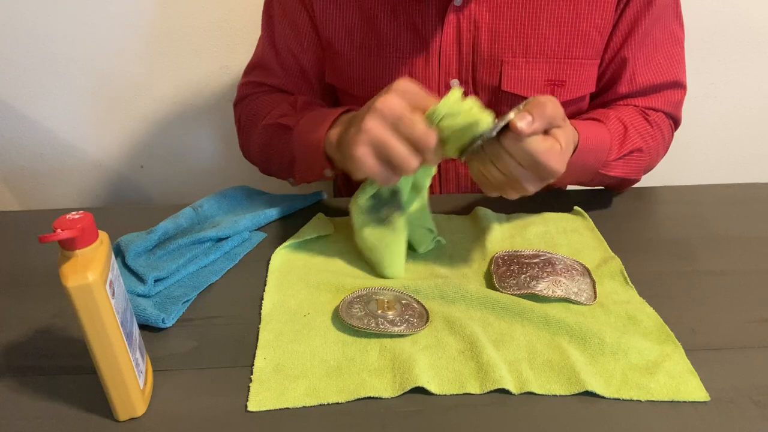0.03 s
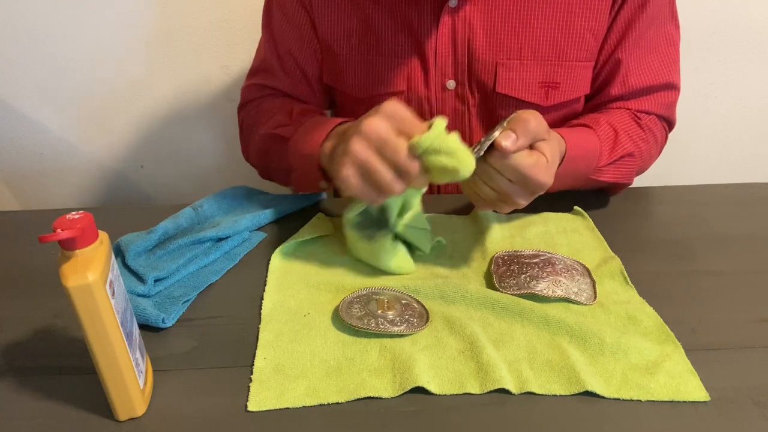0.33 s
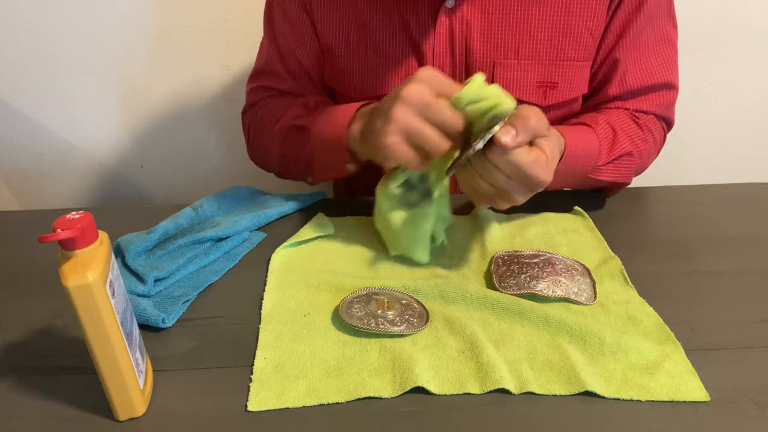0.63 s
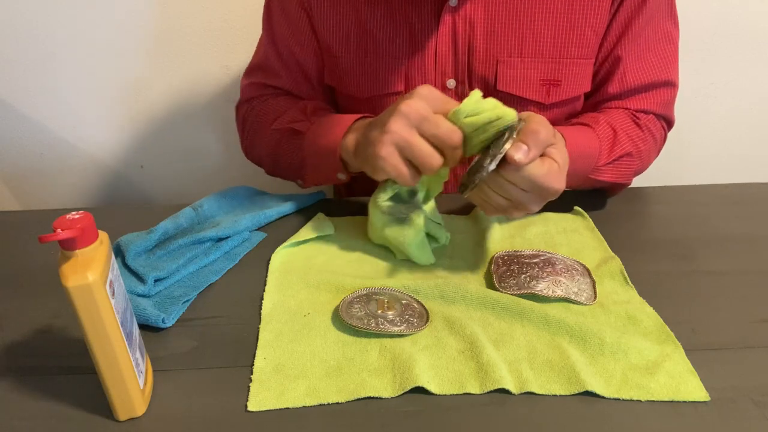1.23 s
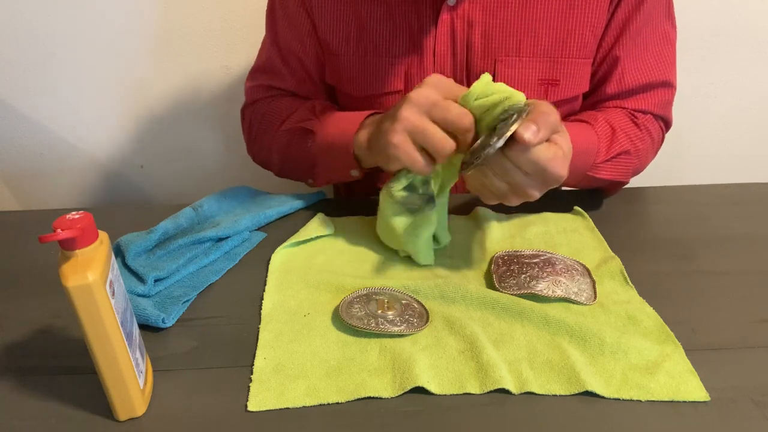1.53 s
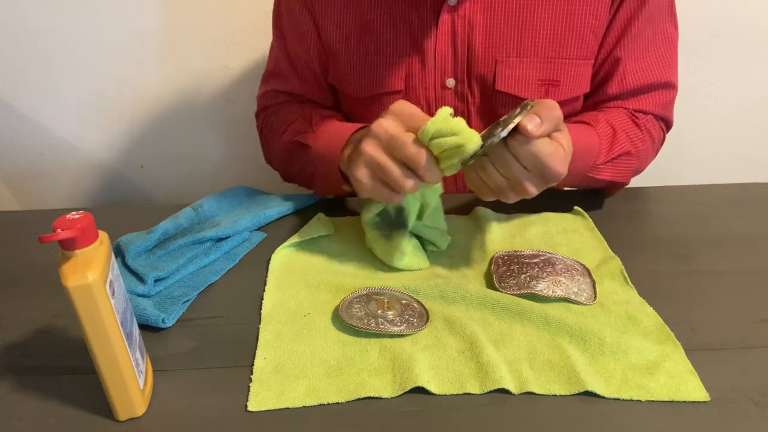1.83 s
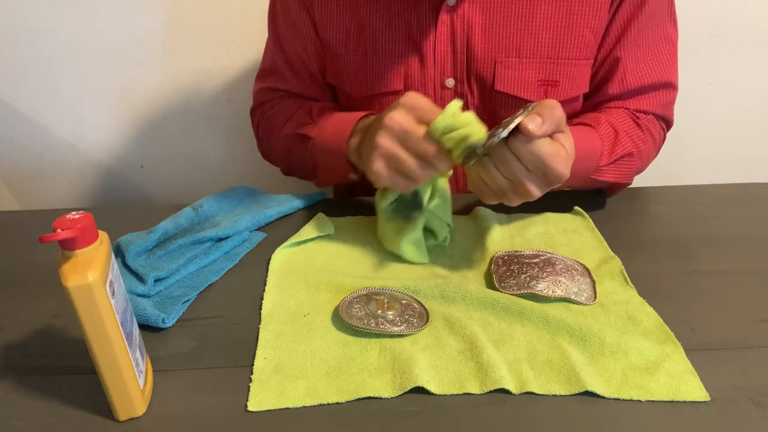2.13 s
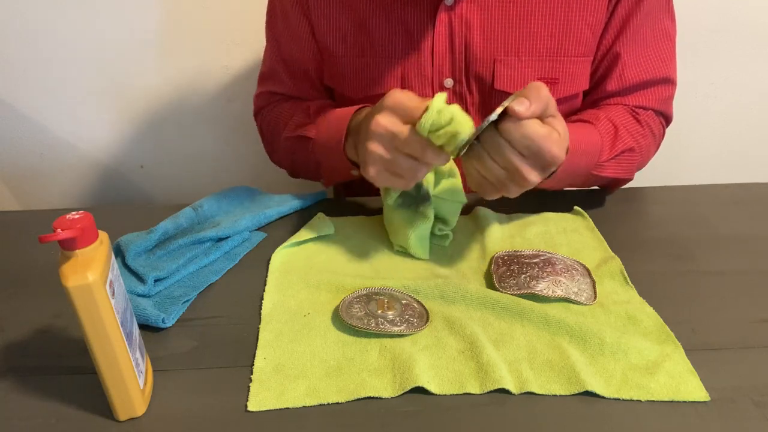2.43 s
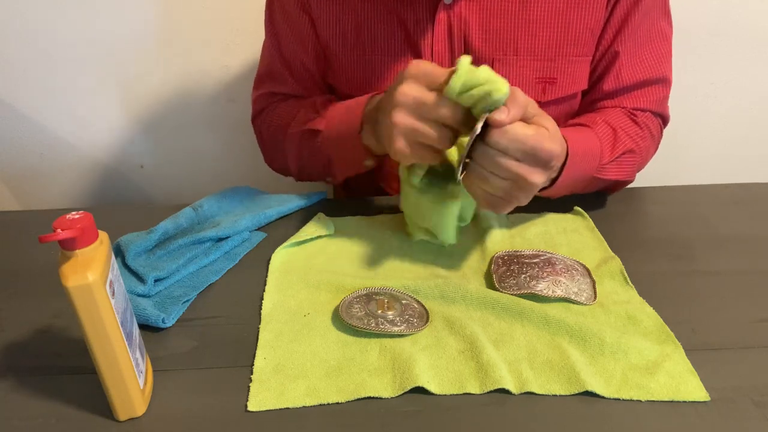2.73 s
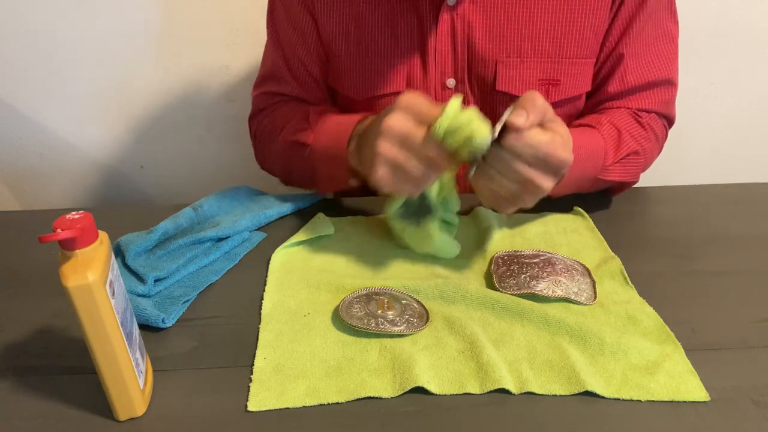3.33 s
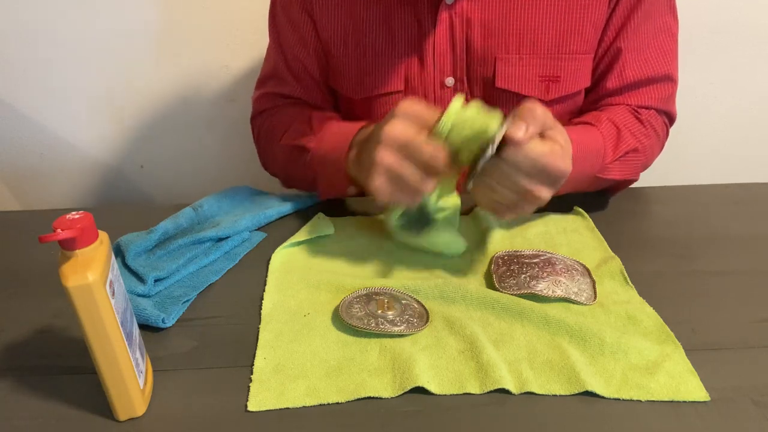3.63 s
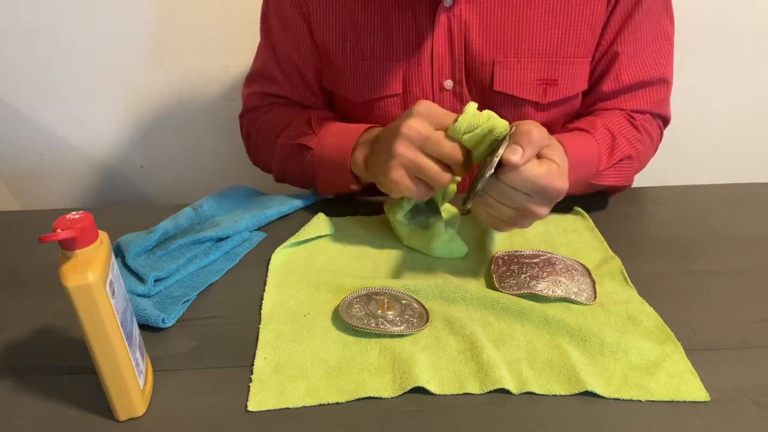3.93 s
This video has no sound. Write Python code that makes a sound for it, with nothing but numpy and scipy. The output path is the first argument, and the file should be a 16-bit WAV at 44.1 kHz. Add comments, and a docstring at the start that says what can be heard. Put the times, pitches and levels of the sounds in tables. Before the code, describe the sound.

A cloth rubs back and forth over a metal belt buckle throughout, close up, in about eight soft hissing strokes a second. It catches with short rasps and a faint metallic ring, most strongly around 0.6, 3.1 and 3.8 seconds. Tiny squeaks come now and then, and the buckle knocks lightly near 0.8 and 1.9 seconds. An appliance hums low and steady in the small room.

```python
"""A small, quiet room with an appliance humming; one microphone, close to a hand-held metal belt buckle.
A cloth is rubbed to and fro over the buckle, about eight strokes a second, each a soft hiss of fibres.
Where the cloth catches on the relief it rasps, lower and grainier, and the metal rings briefly.
Now and then the cloth squeaks, or the buckle shifts in the fingers with a small knock.
At this distance the direct sound leads and the room's reflections stay well behind it."""
import sys
import numpy as np
from scipy import signal
from scipy.fft import rfft, irfft
from scipy.io import wavfile

SR = 44100
rng = np.random.default_rng(int(sys.argv[2]) if len(sys.argv) > 2 else 0)


def persist_wave(psi):
    """Save psi, clipped to +-1, as 16-bit WAV."""
    counts = np.round(np.clip(psi, -1, 1) * 32767).astype(np.int16)
    wavfile.write(sys.argv[1], SR, np.atleast_2d(counts).T)


N = 176400
TIME = np.arange(N) / SR
BIN_HZ = np.arange(N // 2 + 1) * SR / N


def from_db(db):
    """Decibels to gain."""
    return 10 ** (np.asarray(db) / 20)


def unit_rms(x):
    """Scale to an rms of 1."""
    return x / np.sqrt(np.mean(x ** 2) + 1e-20)


def colour(x, spectrum):
    """Filter a steady signal by a table of f/Hz, level/dB; rms 1."""
    hz, db = np.transpose(spectrum)
    gain = from_db(np.interp(np.log(np.maximum(BIN_HZ, 1)), np.log(hz), db))
    return unit_rms(irfft(rfft(x) * gain, N))


def drift(rate_hz):
    """Random wandering, mostly slower than rate_hz; rms 1."""
    return unit_rms(irfft(rfft(rng.standard_normal(N)) / (1 + (BIN_HZ / rate_hz) ** 2), N))


def grains(per_s, spread_db):
    """Friction as tiny random clicks of uneven size."""
    sizes = from_db(spread_db * np.minimum(rng.exponential(1, N), 4))
    return sizes * rng.choice([-1, 1], N) * (rng.random(N) < per_s / SR)


def edge(t, width_s):
    """Smooth step from 0 to 1 around t = 0."""
    return .5 + .5 * np.tanh(t / (2 * width_s))


def around(start, length, margin_s=.06):
    """The samples near an event, and their time since its start."""
    span = slice(max(int((start - margin_s) * SR), 0), int((start + length + margin_s) * SR))
    return span, TIME[span] - start


def moving_contact(x, band_hz=591.5, waver_db=1.2, rate_hz=28, groups=5):
    """The colour shifts as the contact patch moves: interleaved bands waver on their own."""
    group, spectrum = (BIN_HZ // band_hz) % groups, rfft(x)
    bands = [irfft(spectrum * (group == k), N) for k in range(groups)]
    return unit_rms(sum(band * from_db(waver_db * drift(rate_hz)) for band in bands))


def brightness_bands(x, pivot_hz=4400):
    """Split into lows, mids and highs: (octaves from the pivot, signal)."""
    octaves = np.log2(np.maximum(BIN_HZ, 1) / pivot_hz)
    centres, spectrum = [-1.5, 0, 1.5], rfft(x)
    return [(centre, irfft(spectrum * np.interp(octaves, centres, share), N))
            for centre, share in zip(centres, np.eye(3))]


# the appliance's tones at the microphone: f/Hz, rms level/dB
HUM_TONES = [(58.4, -48.5), (119.9, -53), (177, -74), (240.1, -66.5), (291, -77.5), (351, -79), (594, -85)]
# spectrum of the room air: f/Hz, relative level/dB
AIR_SPECTRUM = [(20, -6), (36, 3), (48, 3.5), (90, -4.5), (150, -4), (220, -5), (300, -9), (480, -17),
                (680, -22), (810, -19), (1000, -24.5), (1400, -26), (2500, -34.5), (4000, -37.5),
                (9000, -39.5), (11000, -50.5), (15700, -44)]


def room_tone(waver_db=1.33, waver_hz=4.4, air_db=-58):
    """Motor and mains hum, slightly wavering, over soft room air."""
    hum = 0
    for hz, db in HUM_TONES:
        amplitude = np.sqrt(2) * from_db(db + waver_db * drift(waver_hz))
        hum += amplitude * np.sin(2 * np.pi * (hz * TIME + rng.random()))
    return hum + from_db(air_db) * colour(rng.standard_normal(N), AIR_SPECTRUM)


# strokes of the cloth: start t/s, length/s, relative level/dB, swell start to end/dB, tilt/(dB/octave)
CLOTH_STROKES = [ (-.02, 0.13, -60.5, -3, -1.5), (0.103, 0.07, -62, 0, -6), (.153, 0.061, -58.5, -2, 2),
                 (.2, 0.048, -65.5, -4, 0), (0.275, 0.057, -55.5, 2, -1.5),
                 (0.385, 0.084, -54.5, 2.5, -1.5), (0.542, 0.031, -57, -16, 0),
                 (0.626, 0.086, -60.5, -19, -0.5), (0.725, 0.034, -59, 7, -1.5),
                 (0.802, 0.046, -65.5, 0, -4), (0.836, 0.043, -57.5, 0, 0.5), (.885, 0.037, -79, -4, -4),
                 (1.001, 0.063, -60.5, 2, -6), (1.116, 0.085, -59.5, -3.5, -1.5),
                 (1.279, 0.1, -60, 2.5, -1), (1.425, 0.096, -62.5, 5.5, 2.5), (1.576, 0.15, -64.5, 1, -0.5),
                 (1.722, .108, -62, 11, .5), (1.889, 0.085, -60, -14.5, -1.5), (1.992, 0.066, -56, 10, -1),
                 (2.127, .064, -56.5, -1, 0), (2.24, 0.077, -59, 1, 1), (2.393, 0.033, -72.5, 0, 3),
                 (2.531, 0.084, -62.5, 4, .5), (2.67, 0.078, -60.5, 6.5, .5),
                 (2.805, 0.094, -63.5, -7, 1.5), (2.935, 0.083, -57.5, -8, -1.5),
                 (3.044, 0.071, -59.5, -6, -3.5), (3.16, .054, -58, 0, -3.5), (3.25, 0.047, -58.5, 4, -2),
                 (3.346, 0.075, -62.5, -4, -1), (3.423, 0.057, -60.5, 11, -2.5),
                 (3.526, 0.056, -54, 9, -0.5), (3.6, .04, -65.5, 1, -4), (3.654, 0.06, -58.5, -13, 0),
                 (3.743, 0.075, -56.5, 4, -2), (3.822, 0.067, -62.5, 4, 0), (3.873, 0.056, -64, -1, 0.5),
                 (3.912, 0.072, -67.5, 0, -7)]
# spectrum of the sliding fibres, heard close: f/Hz, relative level/dB
FIBRE_SPECTRUM = [(300, -4), (900, -7.5), (1600, -9.5), (2300, -10), (3150, -7), (3800, -6.5), (4500, -6),
                  (5800, -4.5), (6600, -5.5), (7600, -2.5), (9050, 0.5), (10000, -5.5), (11000, -11.5),
                  (13300, -5.5), (15700, -7.5)]


def cloth_strokes(gain_db=-1, resting_db=-79.5, rise_s=.0063, fall_s=.01, arch_db=1):
    """Fibres slide over the metal, swelling with each stroke and nearly resting at the turns."""
    fibres = colour(grains(per_s=16000, spread_db=3.5), FIBRE_SPECTRUM)
    hiss = 0
    for octaves, band in brightness_bands(moving_contact(fibres)):
        power = np.full(N, from_db(resting_db) ** 2)
        for start, length, db, swell_db, tilt in CLOTH_STROKES:
            span, t = around(start, length)
            travel = np.clip(t / length, 0, 1) - .5
            slowing_db = arch_db * (2 * travel) ** 2  # a stroke is fastest in the middle
            level = from_db(db + swell_db * travel - slowing_db + tilt * octaves)
            power[span] += (level * edge(t, rise_s) * edge(length - t, fall_s)) ** 2
        hiss += np.sqrt(power) * band
    pressure_db = 1.38 * drift(rate_hz=52)
    return hiss * from_db(gain_db + pressure_db)


# modes of the hand-damped buckle: f/Hz, width/Hz, relative level/dB
BUCKLE_MODES = [(1422, 60, -10.5), (1788, 39, 6.5), (2000, 41, -5), (2710, 50, -2), (2876, 33, -4),
                (3180, 29, -10.5), (3460, 35, 4.5), (4190, 45, -4.5), (4980, 57, -5), (5600, 88, 5.5),
                (5870, 88, -3), (9200, 200, -13)]


def buckle_ring(friction, gain_db=-6.5):
    """The buckle's modes ring briefly under the friction."""
    return sum(from_db(gain_db + db) * resonance(friction, hz, width) for hz, width, db in BUCKLE_MODES)


def resonance(x, hz, width_hz):
    """One resonance with a gain of 1 at its top."""
    radius = np.exp(-np.pi * width_hz / SR)
    feedforward = (1 - radius ** 2) / 2 * np.array([1, 0, -1])
    feedback = [1, -2 * radius * np.cos(2 * np.pi * hz / SR), radius ** 2]
    return signal.lfilter(feedforward, feedback, x + 1e-18)


# the cloth catches on the relief: peak t/s, relative level/dB, decay/s, tilt/(dB/octave)
RELIEF_CATCHES = [ (.01, -64.5, 0.29, -1.5), (0.162, -61, 0.055, -5), (.289, -49.5, .006, 3),
                  (0.297, -57.5, 0.037, -3), (0.392, -62, 0.014, 1), (0.421, -68, 0.031, -8.5),
                  (0.545, -51, 0.012, -0.2), (0.576, -58.5, 0.011, 1.5), (0.625, -53.5, .01, -1),
                  (0.632, -51, 0.018, 1.5), (0.658, -61, 0.027, -3), (0.751, -49.5, 0.0088, 1.5),
                  (.771, -54, 0.0049, -2), (0.85, -53.5, 0.0072, 2), (0.866, -53.5, .012, 1),
                  (1.023, -52, 0.0053, -2.5), (1.032, -53.5, 0.021, 4), (1.061, -58, 0.0083, 1),
                  (1.139, -62, 0.044, -5), (1.608, -61, 0.097, 3.5), (1.906, -62, 0.037, 0),
                  (2.022, -66, 0.015, -6), (2.05, -52, 0.0069, -1.5), (2.144, -54, 0.0086, 1),
                  (2.155, -62, 0.017, 3), (2.27, -49.5, 0.0065, 1.5), (2.289, -63.5, 0.0071, -5),
                  (2.305, -64, .006, -6), (2.727, -61, 0.016, 7.5), (2.943, -59, .015, 4.5),
                  (2.962, -52, 0.0083, 0.5), (3.059, -56, .008, -2), (3.067, -46.5, 0.017, 0.8),
                  (3.081, -48.5, 0.0072, -0.5), (3.19, -56.5, 0.016, 1.5), (3.265, -58, 0.016, 0),
                  (3.294, -52.5, 0.0084, 2.5), (3.363, -64, 0.042, 3), (3.445, -56, 0.0044, -1),
                  (3.46, -53, .015, 2.5), (3.532, -58, 0.037, 1.5), (3.579, -57.5, 0.0078, -4.5),
                  (3.662, -55.5, .008, -4), (3.673, -56.5, 0.014, -2.5), (3.693, -60, 0.033, 1),
                  (3.753, -59, 0.0044, 0), (3.767, -52, 0.0087, 2), (3.774, -45.5, .013, -1.7),
                  (3.8, -65, 0.069, -6)]
# spectrum of the rasp on the hand-damped metal: f/Hz, relative level/dB
RASP_SPECTRUM = [(250, -3), (420, 1), (680, -11), (900, -15), (1100, -2.5), (1450, -1), (1950, -1),
                 (2200, -1.5), (2520, -8), (2780, -1.5), (3200, -4.5), (3700, -10), (4400, -1.5),
                 (5150, -6.5), (6000, -4.5), (6800, -11.5), (7700, -8), (8800, -5), (10800, -19),
                 (14000, -10)]


def cloth_catches(gain_db=-4, rise_s=.0035):
    """The weave snags and lets go in a dying run of tiny slips."""
    slips = colour(grains(per_s=4000, spread_db=-1), RASP_SPECTRUM)
    rasp = 0
    for octaves, band in brightness_bands(moving_contact(slips)):
        power = np.zeros(N)
        for peak_s, db, decay_s, tilt in RELIEF_CATCHES:
            span, t = around(peak_s, 10 * decay_s)
            width_s = np.where(t < 0, rise_s, decay_s)
            envelope = np.exp(-np.abs(t / width_s) ** 1.5)  # the slips hold on, then stop quickly
            power[span] += (from_db(db + tilt * octaves) * envelope) ** 2
        rasp += np.sqrt(power) * band
    return from_db(gain_db) * rasp


# faint squeaks of the cloth on smooth metal: middle t/s, length/s, level/dB, f/Hz
CLOTH_SQUEAKS = [(0.29, .008, -65, 2900), (.546, 0.013, -58.5, 1570), (0.64, .035, -58.5, 1770),
                 (.755, 0.0096, -61, 1950), (1.024, 0.0071, -60, 2890), (2.27, 0.015, -65, 5000),
                 (2.56, 0.037, -73, 3180), (2.606, 0.026, -73, 3170), (2.87, 0.066, -78, 2910),
                 (3.078, 0.024, -61.5, 3020)]


def cloth_squeaks(width_hz=400):
    """The slips briefly fall into step and give a breathy pitch."""
    squeaks = np.zeros(N)
    for middle_s, length, db, hz in CLOTH_SQUEAKS:
        span, t = around(middle_s - length, 2 * length)
        noise = rng.standard_normal(SR // 2)
        tone = unit_rms(resonance(resonance(noise, hz, width_hz), hz, width_hz))
        envelope = np.exp(-np.minimum((2 * (t - length) / length) ** 2, 20))
        squeaks[span] += from_db(db) * tone[:len(t)] * envelope
    return squeaks


# the buckle shifts in the fingers: t/s, level per mode/dB, f/Hz, t60/s
BUCKLE_KNOCKS = [(0.766, -49, 404, 0.05), (.811, -52.5, 827, 0.036), (1.895, -59, 452, 0.089),
                 (1.984, -50.5, 4830, 0.006)]
# the close modes of a knock: ratio to its f
KNOCK_MODE_RATIOS = [0.78, 1, 1.15]


def buckle_knocks():
    """Each knock rings a few close modes that the hand damps at once."""
    knocks = np.zeros(N)
    for start, db, hz, t60 in BUCKLE_KNOCKS:
        t = np.maximum(TIME - start, 0)
        modes = sum(rng.uniform(.85, 1) * np.sin(2 * np.pi * (hz * ratio * t + rng.random()))
                    for ratio in KNOCK_MODE_RATIOS)
        attack = 1 - np.exp(-t * hz)
        decay = np.exp(-np.minimum(np.log(1000) * t / t60, 20))
        knocks += from_db(db) * modes * attack * decay
    return knocks


def room_reflections(direct, gain_db=-11.5, t60_s=.34, delay_s=.004):
    """The small room's diffuse reflections reach the microphone just after the direct sound."""
    t = TIME[:SR // 2]
    tail = rng.standard_normal(len(t)) * np.exp(-np.log(1000) * t / t60_s) * (t > delay_s)
    tail /= np.sqrt(np.sum(tail ** 2))
    return from_db(gain_db) * signal.fftconvolve(direct, tail)[:N]


def scene():
    """At the microphone, in mono: the polishing up close, its reflections and the room tone."""
    hiss, rasp = cloth_strokes(), cloth_catches()
    ring = buckle_ring(rasp + from_db(-10) * hiss)  # sliding stirs the metal less than catching
    polishing = hiss + rasp + ring + cloth_squeaks() + buckle_knocks()
    return (polishing + room_reflections(polishing) + room_tone())[None]


def record(dry, rolloff_hz=15000, cutoff_hz=15650):
    """The top of the microphone's signal rolls off softly, then is cut steeply."""
    softened = signal.sosfilt(signal.butter(3, rolloff_hz, fs=SR, output="sos"), dry)
    return signal.sosfilt(signal.ellip(12, .1, 80, cutoff_hz, fs=SR, output="sos"), softened)


dry = scene()
out = record(dry)
persist_wave(out)
```